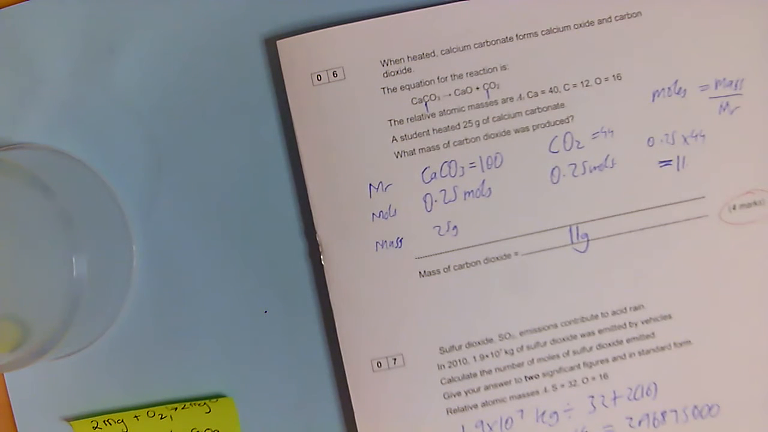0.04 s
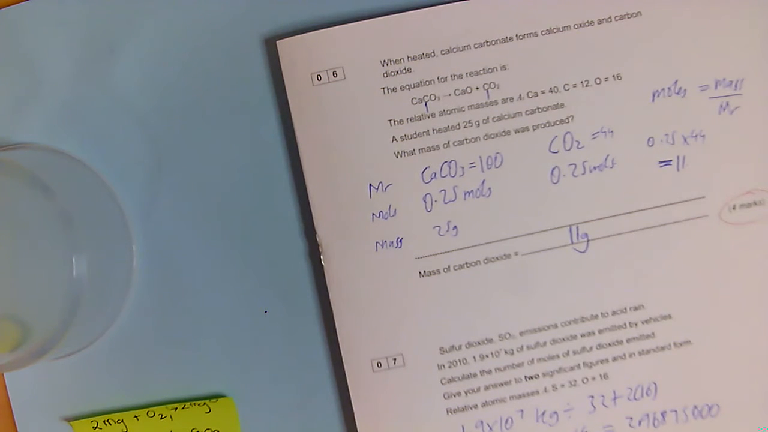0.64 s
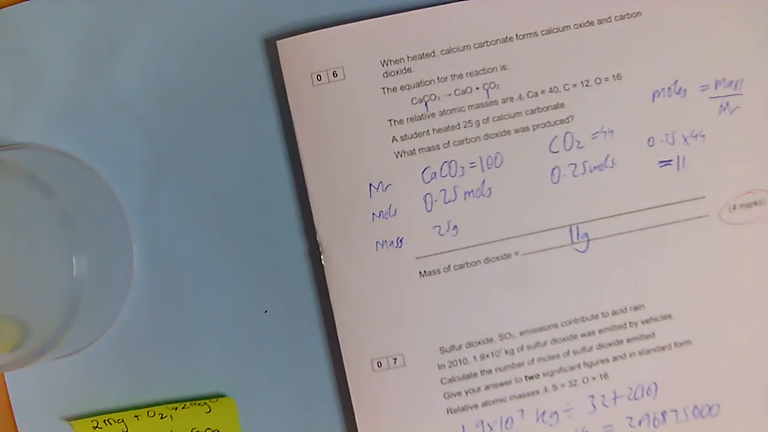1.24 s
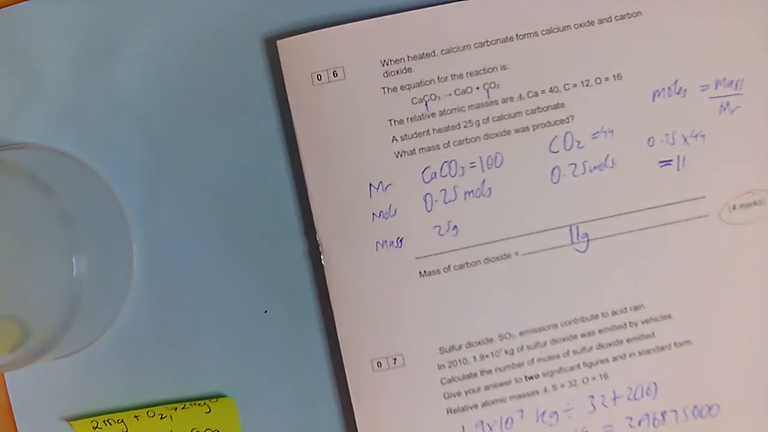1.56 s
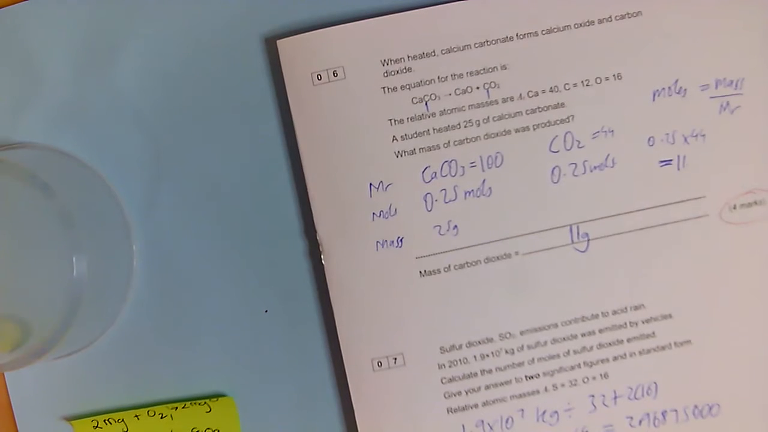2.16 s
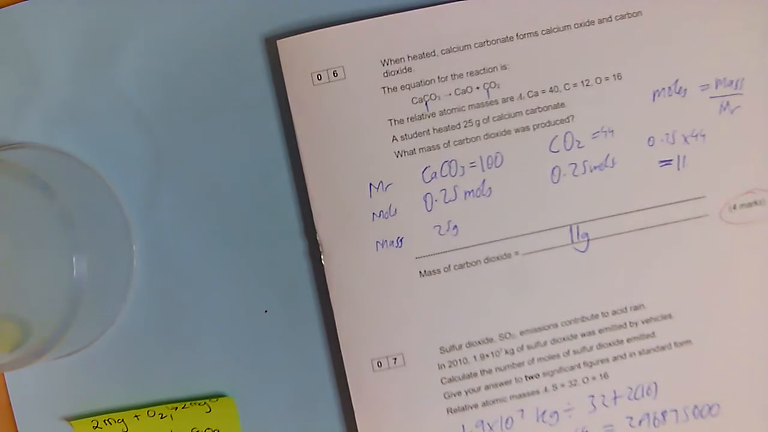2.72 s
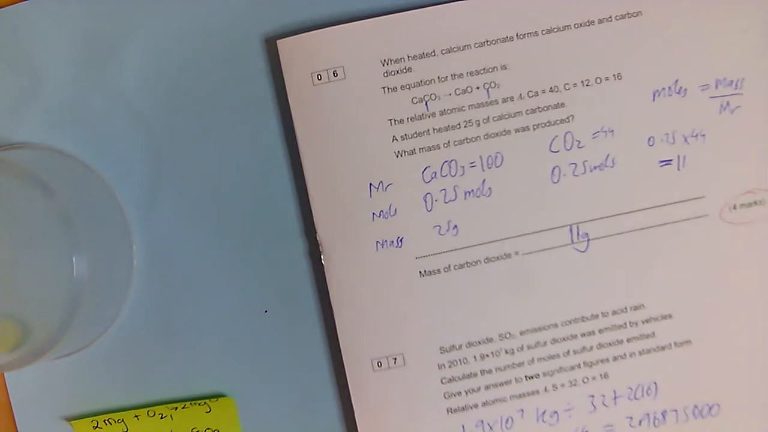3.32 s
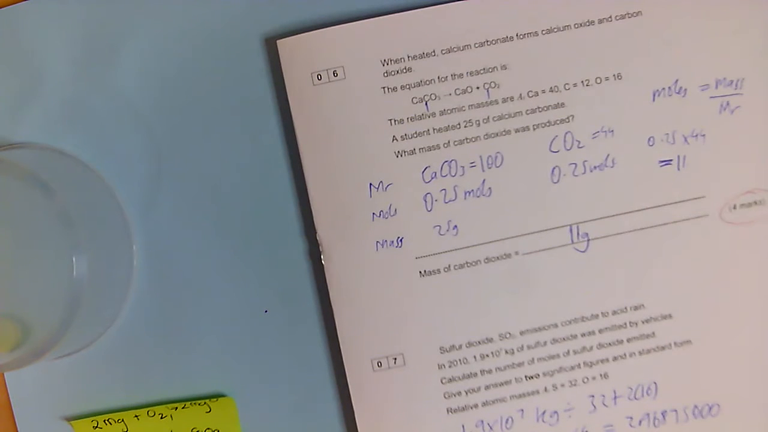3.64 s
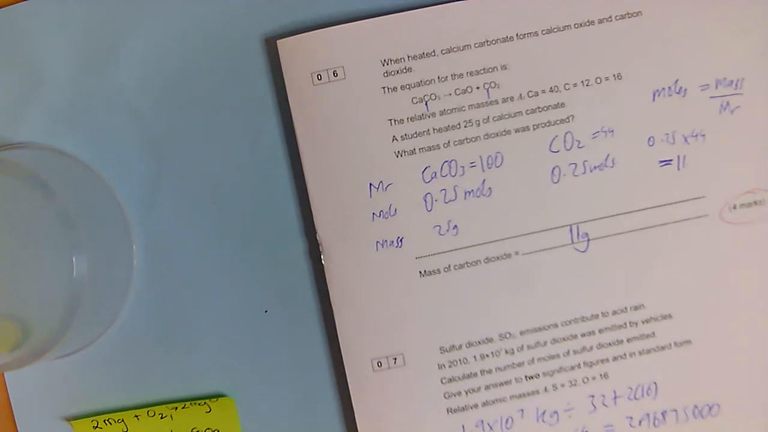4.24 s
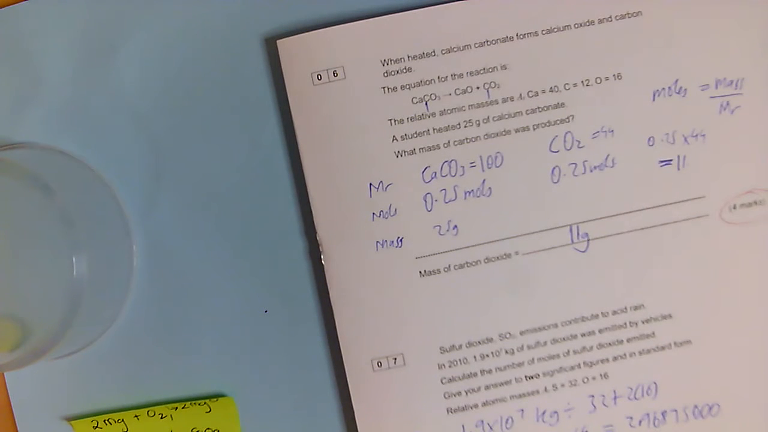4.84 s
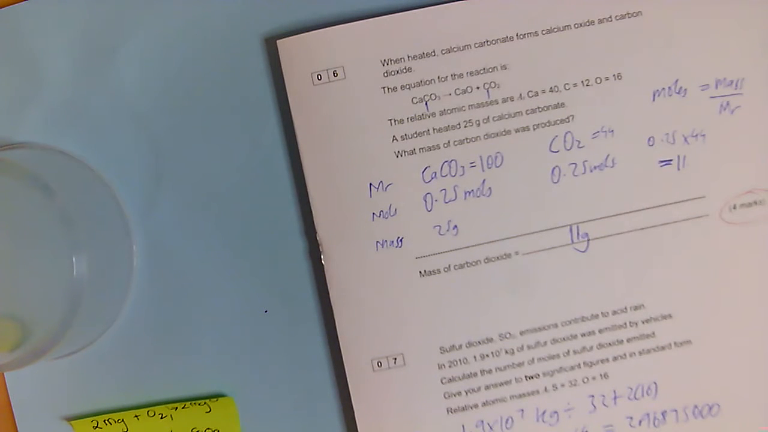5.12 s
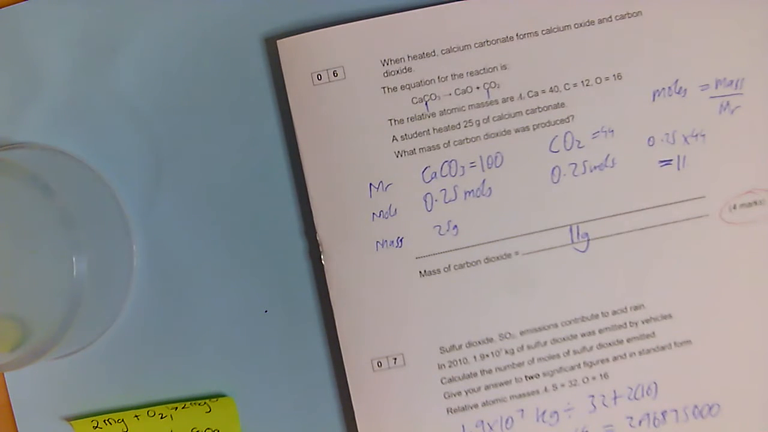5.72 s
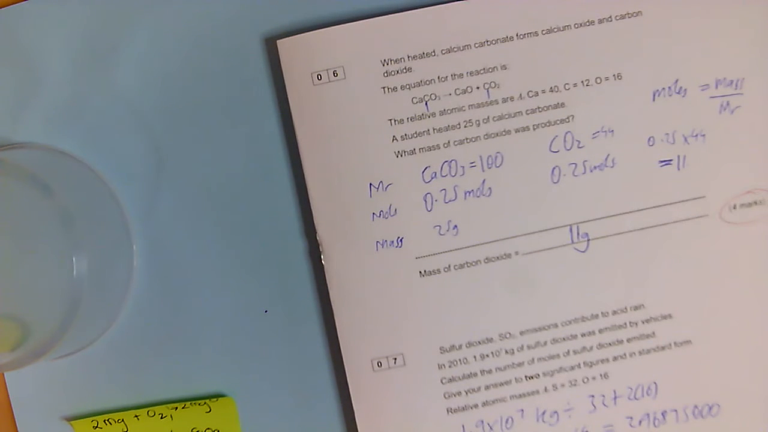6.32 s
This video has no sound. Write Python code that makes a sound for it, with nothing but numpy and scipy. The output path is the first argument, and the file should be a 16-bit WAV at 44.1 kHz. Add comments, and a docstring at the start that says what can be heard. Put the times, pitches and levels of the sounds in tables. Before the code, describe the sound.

A pen works on a paper booklet on a desk, heard close up in a quiet room. From the start, its tip makes light, dry taps and short, uneven scratches, some with a slightly hollow ring. The strokes grow stronger around 1.5 seconds and lead to the loudest sound at about 1.8 seconds, a sharp knock with a low thump through the desk. A lull follows, with only a few faint ticks and a weak, low drone that sinks in pitch between 2.2 and 2.9 seconds. The tapping and scratching then resume, getting busier from about 4 seconds, with soft, dull bumps of the hand. Crisp taps stand out near 4.7 and 5.4 seconds, and a second knock comes at 5.8. Lighter strokes continue until about 6.5 seconds. Soft room noise, a low hum and a very faint high whine run throughout.

```python
"""A pen taps and scratches on a paper booklet lying on a desk, close by in a quiet room.
The tip catches on paper fibres in uneven bursts; every catch and tap makes paper and desk ring.
A few harder blows ring the desk top, and the hardest thumps the whole desk.
Behind it lie soft room noise, a low hum, a brief drone and the thin whine of microphone electronics."""
import sys
import numpy as np
from scipy import signal
from scipy.fft import rfft, irfft
from scipy.io import wavfile
from scipy.ndimage import uniform_filter1d

SR = 44100
rng = np.random.default_rng(int(sys.argv[2]) if len(sys.argv) > 2 else 0)


def generate_wav(sig):
    """Save sig (samples, or channels by samples) to the path in sys.argv[1] as 16-bit PCM at SR."""
    pcm = np.round(np.clip(np.atleast_2d(sig).T, -1, 1) * 32767).astype(np.int16)
    wavfile.write(sys.argv[1], SR, pcm)


N = 285768


def gain_of(db):
    """Turns decibels into a number to multiply a sound by."""
    return 10 ** (np.asarray(db) / 20)


def evened(x):
    """Scales a sound to an average strength (rms) of one."""
    return x / np.sqrt(np.mean(x ** 2) + 1e-20)


def burst(sound, level_db):
    """Gives a short sound the energy of a fiftieth of a second at this level."""
    return gain_of(level_db) * np.sqrt(SR / 50) * sound / np.linalg.norm(sound)


def decay(t, t60):
    """A fade that falls by 60 dB every t60 seconds."""
    return np.exp(-np.log(1000) * t / t60)


def value_at(points, hz):
    """Reads between (Hz, value) points on a logarithmic pitch scale."""
    point_hz, value = np.transpose(points)
    return np.interp(np.log(hz + 1), np.log(point_hz + 1), value)


def octave_around(x, hz, order):
    """Keeps a band one octave wide; a higher order gives steeper edges."""
    edges = [hz / np.sqrt(2), hz * np.sqrt(2)]
    return signal.sosfilt(signal.butter(order, edges, "bandpass", fs=SR, output="sos"), x)


def add(mix, start, sound):
    """Mixes a sound in at a start time in seconds."""
    part = mix[max(round(start * SR), 0):][:len(sound)]
    part += sound[:len(part)]


def crossfades(count, seconds):
    """Fades that hand over to one another in turn, keeping the total power steady."""
    place = (np.arange(N) / SR / seconds - np.arange(count)[:, None]) % count
    distance = np.minimum(place, count - place)
    return np.cos(np.pi / 2 * np.minimum(distance, 1))


# The tone colour of the room noise. Each row: frequency in Hz, relative level in dB.
NOISE_COLOUR = [(15, -28), (28, -4), (90, -3.5), (140, -6.5), (300, -12.5), (520, -14.5), (800, -15),
                (1450, -15.5), (2000, -28), (2800, -31), (6500, -37.5), (8400, -36.5), (13000, -41.5),
                (15500, -53)]
def room_noise(level_db=-55):
    """A soft, even rush, strongest in the bass."""
    colour = gain_of(value_at(NOISE_COLOUR, np.fft.rfftfreq(N, 1 / SR)))
    noise = irfft(rfft(rng.standard_normal(N)) * colour, N)
    return gain_of(level_db) * evened(noise)


# Steady tones. Each row: pitch in Hz, average level in dB.
HUM_AND_WHINE = [(49, -65.5), (119, -62.5), (192, -70), (283, -68.5), (8000, -77), (8280, -76),
                 (10756, -87.5), (11041, -91)]
def hum_and_whine(waver_db=1):
    """A low hum and the thin whine of electronics; each tone wavers a little in level."""
    t, out = np.arange(N) / SR, np.zeros(N)
    for hz, level_db in HUM_AND_WHINE:
        waver = np.interp(t, np.linspace(0, t[-1], num=40), rng.standard_normal(size=40))
        tone = np.sqrt(2) * np.sin(2 * np.pi * (hz * t + rng.random()))
        out += gain_of(level_db + waver_db * waver) * tone
    return out


# The course of the drone. Each row: time in seconds, pitch in Hz, level in dB.
DRONE_PATH = [(2.2, 101.7, -75), (2.35, 92.3, -56.5), (2.65, 86.4, -59), (2.9, 77.7, -68)]
def drone():
    """A faint low note swells and fades while its pitch sinks."""
    t = np.arange(N) / SR
    times, hz, level_db = np.transpose(DRONE_PATH)
    tone = np.sqrt(2) * np.sin(2 * np.pi * np.cumsum(np.interp(t, times, hz)) / SR)
    sounding = (t > times[0]) & (t < times[-1])
    return sounding * gain_of(np.interp(t, times, level_db)) * tone


def room_echo(x, t60, treble_t60, delay_s, treble_db=0):
    """Many reflections blur into a tail whose treble has its own strength and fade."""
    reflections = rng.choice([-1., 1.], SR) * (rng.random(SR) < 4000 / SR)  # about 4000 a second
    hz, t, spectrum = signal.stft(reflections, SR, nperseg=256)
    fade = decay(t, value_at([(1500, t60), (9000, treble_t60)], hz)[:, None])
    colour = gain_of(value_at([(2000, 0), (9000, treble_db)], hz))[:, None]
    tail = signal.istft(spectrum * fade * colour, SR, nperseg=256)[1]
    out = np.zeros(N)
    add(out, delay_s, signal.fftconvolve(x, tail / np.linalg.norm(tail)))
    return out * np.sqrt(np.mean(colour ** 2))


# The hand bumping the desk. Each row: start in seconds, level in dB, pitch in Hz.
HAND_PATS = [(0.965, -49.5, 122), (1.685, -35, 344), (1.775, -55, 70), (1.85, -41.5, 45), (3.676, -38, 293),
             (4.259, -39, 191), (4.267, -40.5, 101), (4.523, -49, 259), (4.882, -53, 310), (5.21, -48, 100),
             (5.245, -49, 94), (5.285, -50, 100), (5.807, -43.5, 480)]
def hand_pats(t60=0.09, rise_s=0.0095):
    """The soft hand gives a short, dull puff around one pitch."""
    t, out = np.arange(SR // 4) / SR, np.zeros(N)
    for start, level_db, hz in HAND_PATS:
        push = rng.standard_normal(len(t)) * (1 - np.exp(-t / rise_s)) * decay(t, t60)
        add(out, start, burst(octave_around(push, hz, order=2), level_db))
    return out


# The whole desk's low notes. Each row: pitch in Hz, relative level in dB, seconds to fade by 60 dB.
DESK_NOTES = [(34.3, -10.5, 0.49), (78.5, -14, 0.19), (131.7, 6, 0.15), (143.4, -5.5, 0.21),
              (293, -2, 0.052), (436, -2, 0.095), (698, 6, 0.049)]
# Blows that move the whole desk. Each row: start in seconds, level in dB.
DESK_THUMPS = [(1.753, -43), (1.768, -23)]
def desk_thumps(rise_s=0.0073):
    """A heavy blow sets the whole desk swinging at its low notes."""
    t, out = np.arange(SR // 2) / SR, np.zeros(N)
    thump = sum(gain_of(db) * decay(t, t60) * np.sin(2 * np.pi * hz * t) for hz, db, t60 in DESK_NOTES)
    for start, level_db in DESK_THUMPS:
        add(out, start, gain_of(level_db) * thump * (1 - np.exp(-t / rise_s)))
    return out


# Notes of desk top and booklet. Each row: pitch in Hz, relative level in dB, seconds to fade by 60 dB.
TOP_NOTES = [(474, -10.5, 0.085), (520, -21.5, 0.18), (940, -23, 0.049), (1105, 0, 0.067), (1297, 1, 0.07),
             (1471, 3, 0.036), (1499, -15, 0.18), (1570, -16, 0.22), (1690, -15.5, 0.16), (2090, -15, 0.11),
             (2340, -16, 0.11), (2600, -12, .09), (3800, -35, 0.1), (6460, -29, 0.13)]
# Hard blows through the booklet. Each row: start in seconds, level in dB, favoured pitch in Hz.
DESK_KNOCKS = [(1.6827, -32, 910), (1.7535, -18.5, 1375), (5.8062, -21, 1090)]
def desk_knocks(rise_s=0.00011, favour_db=7, favour_octaves=0.14):
    """A hard blow rings the desk top; the place it lands on favours the notes near one pitch."""
    t, out = np.arange(SR // 3) / SR, np.zeros(N)
    for start, level_db, favoured_hz in DESK_KNOCKS:
        for hz, note_db, t60 in TOP_NOTES:
            boost_db = favour_db * np.exp(-(np.log2(hz / favoured_hz) / favour_octaves) ** 2)
            note = decay(t, t60) * np.sin(2 * np.pi * (hz * t + rng.random()))
            add(out, start, gain_of(level_db + note_db + boost_db) * note * (1 - np.exp(-t / rise_s)))
    return out


def fibre_catches(samples, per_s, spread_db):
    """Fibres snap free under the tip: random clicks, most small, a few large."""
    size = gain_of(spread_db * np.minimum(rng.exponential(1, samples), 4))
    return size * rng.choice([-1, 1], samples) * (rng.random(samples) < per_s / SR)


def ring(colour, size=2048):
    """The short ring that follows one click, in the given tone colour."""
    log_gain = np.log(gain_of(value_at(colour, abs(np.fft.fftfreq(size, 1 / SR)))))
    spectrum = np.exp(np.conj(signal.hilbert(log_gain)))  # nothing sounds before the click
    ringing = np.fft.ifft(spectrum).real[:size // 2]
    return ringing / np.linalg.norm(ringing)


# The four voices of paper on a desk. Each row: frequency in Hz, relative level in dB.
DULL_BODY = [(60, 0.5), (170, -32.5), (300, 7.5), (450, 1), (620, 3.5), (800, -5.5), (1100, 1),
             (2500, -88.5)]
PAPERY_MIDDLE = [(300, -65), (650, -18.5), (800, -11), (950, -3), (1080, -1), (1220, -0.5), (1380, 3.5),
                 (1550, -0.5), (1720, -4), (2050, -9.5), (2600, -26.5), (3300, -40.5), (6000, -89)]
CRISP_EDGE = [(1200, -32.5), (2250, 2.5), (3100, -1), (3900, 3), (4450, 5.5), (5700, -7.5), (6700, -5),
              (7600, -22), (10000, -19), (15500, -54)]
FINE_SHEEN = [(4000, -45), (7000, -4), (8700, 4), (9900, 15.5), (10900, 2), (12500, 5), (14500, -16),
              (15700, -33)]
# Echoes off nearby things. Each row: typical delay in seconds, relative strength (minus flips the wave).
NEARBY_ECHOES = [(.00335, -0.46), (0.0097, 0.52), (0.018, 0.014)]
def paper_voices(focus=1):
    """Each spot on the page rings and echoes in its own way; a focus under 1 weakens both quirks."""
    hz = np.geomspace(60, 16000, num=130)
    resonances_db = focus * np.interp(hz, [1500, 4000], [1.8, 1]) * rng.standard_normal(len(hz))
    paths = np.zeros(SR // 40)
    paths[0] = 1  # the direct sound
    for delay, strength in NEARBY_ECHOES:
        add(paths, delay * rng.uniform(.8, 1.2), np.array([focus * strength]))
    voices = []
    for colour in (DULL_BODY, PAPERY_MIDDLE, CRISP_EDGE, FINE_SHEEN):
        spot_colour = np.c_[hz, value_at(colour, hz) + resonances_db]
        voice = signal.fftconvolve(ring(spot_colour), paths)
        voices.append(voice / np.linalg.norm(voice))
    return voices


# Papery rasps. Each row: start in seconds, level in dB, sheen in dB relative to the crisp edge.
PAPER_RASPS = [(0.789, -52.5, -28), (1.757, -51, -9), (2.895, -57.5, -25), (3.646, -58, -11),
               (3.757, -55, -22), (4.24, -51, -17), (4.728, -44, -14), (5.388, -48, -10),
               (5.808, -41.5, -11.5)]
def paper_rasps(t60=0.12, rise_s=0.00156):
    """After a hard strike the sheet crackles as it settles."""
    t, out = np.arange(SR // 6) / SR, np.zeros(N)
    settle = (1 - np.exp(-t / rise_s)) * decay(t, t60)
    for start, level_db, sheen_db in PAPER_RASPS:
        crackle = fibre_catches(len(t), per_s=3000, spread_db=2.5) * settle
        _, _, crisp, sheen = paper_voices(focus=0.26)
        rasp = signal.fftconvolve(crackle, crisp + gain_of(sheen_db) * sheen)
        add(out, start, burst(rasp, level_db))
    return out


# Hollow scuffs. Each row: start in seconds, length in seconds, level in dB, pitch in Hz.
TIP_DRAGS = [(0.246, 0.005, -43.5, 1070), (0.691, 0.014, -37, 1130), (0.846, 0.014, -34.5, 1310),
             (1.124, 0.0088, -36.5, 1080), (1.478, 0.035, -35, 1300), (3.131, 0.0028, -42.5, 900),
             (3.264, 0.018, -37, 1435), (4.615, 0.017, -34, 1040), (4.872, 0.012, -34, 970),
             (5.387, 0.021, -30.5, 1006), (5.388, 0.014, -32.5, 1960), (5.59, 0.0027, -37, 1330)]
def tip_drags(width_hz=90, rise_s=0.0021, release_s=0.0044):
    """The dragging tip makes the sheet ring at one pitch, which gives a hollow note."""
    t, out = np.arange(SR // 6) / SR, np.zeros(N)
    for start, length, level_db, hz in TIP_DRAGS:
        drag = np.minimum(t / rise_s, 1) * np.exp(-np.maximum(t - length, 0) / release_s)
        push = fibre_catches(len(t), per_s=3000, spread_db=2.0) * drag
        ringing = np.exp(-np.pi * width_hz * t) * np.sin(2 * np.pi * hz * t)
        add(out, start, burst(signal.fftconvolve(push, ringing), level_db))
    return out


# Dry snaps as the pen lands. Each row: start in seconds, level in dB, pitch in Hz.
TIP_SNAPS = [(.79, -58.5, 5140), (1.686, -49, 2680), (1.7543, -39.5, 2750), (2.894, -50, 2680),
             (3.01, -51.5, 3400), (3.07, -54.5, 3250), (3.194, -55.5, 2940), (3.266, -47, 2280),
             (3.645, -59, 2470), (3.757, -48, 3400), (4.237, -53, 5330), (4.725, -42, 4180),
             (5.188, -52.5, 5450), (5.3855, -43, 5340), (5.48, -53.5, 6000), (5.687, -70, 4100)]
def tip_snaps(t60=0.0018, shudder=0.11, shudder_t60=0.18):
    """The hard point gives a sharp click around one pitch, and the sheet shudders after it."""
    t, out = np.arange(SR // 12) / SR, np.zeros(N)
    fade = decay(t, t60) + shudder * decay(t, shudder_t60)
    for start, level_db, hz in TIP_SNAPS:
        click = octave_around(rng.standard_normal(len(t)) * fade, hz, order=3)
        add(out, start, burst(click, level_db))
    return out


def stroke_pressure(start, length, lift_s, press_s=0.01, ease_db=-1.5):
    """In one stroke the pen presses in, eases off and lifts."""
    t, pressure = np.arange(round((length + 6 * lift_s) * SR)) / SR, np.zeros(N)
    press = np.minimum(t / press_s, 1)
    lift = np.exp(-np.maximum(t - length, 0) / lift_s)
    add(pressure, start, press * gain_of(ease_db * t / length) * lift)
    return pressure


# Pen strokes. Each row: start in seconds, length in seconds, level in dB, relative crispness in dB.
PEN_STROKES = [(0.0, 0.073, -55.5, -16), (0.384, 0.17, -55, -20), (0.614, 0.17, -52, -25),
               (0.812, 0.12, -51, -20), (1.14, 0.024, -40, -18), (1.449, 0.064, -35.5, -19.5),
               (1.527, 0.02, -43.5, -19), (1.553, 0.038, -42.5, -15.5), (1.595, 0.042, -43, -15),
               (1.654, 0.028, -39.5, -15.5), (1.67, 0.077, -39, -18), (1.992, 0.08, -57, -12),
               (2.307, 0.027, -59.5, -12), (2.811, 0.074, -56.5, -17), (2.932, 0.041, -43, -19),
               (3.17, 0.25, -54, -20), (3.343, 0.058, -46.5, -14.5), (3.41, 0.074, -60, -8),
               (3.496, 0.031, -49, -14), (3.695, 0.12, -50, -18), (3.818, 0.091, -49, -12.5),
               (4.048, 0.059, -47, -14), (4.117, 0.084, -43, -13.5), (4.275, 0.073, -49, -18),
               (4.457, 0.15, -44.5, -11.5), (4.624, 0.314, -41, -19.5), (4.815, 0.094, -38, -14.5),
               (5.058, 0.18, -52.5, -14.5), (5.162, 0.041, -40, -18), (5.233, 0.18, -47, -16),
               (5.359, 0.11, -43.5, -12.5), (5.536, 0.094, -57, -21), (5.651, 0.1, -51, -8),
               (5.766, 0.076, -44.5, -13), (5.94, 0.19, -53, -13.5), (6.105, 0.066, -49.5, -18),
               (6.271, 0.11, -47, -11), (6.346, 0.2, -46.5, -12)]
# Long spells when the hand brushes the page between strokes. Each row reads like a pen stroke.
WRITING_SPELLS = [(0, 1.303, -61, -19), (2.887, 3.6, -61, -11)]
# Fine, high hisses of the paper. Each row: start in seconds, length in seconds, level in dB.
PAPER_HISSES = [(1.155, 0.033, -67), (1.62, 0.17, -66), (3.643, .012, -68), (4.14, .05, -71),
                (4.421, 0.28, -74), (4.828, 0.073, -74), (5.182, 0.0046, -49.5), (5.374, 0.011, -49),
                (5.801, 0.0091, -47)]
def pen_scratching(body_db=-11, sheen_db=-17):
    """The tip plucks fine fibres and coarser grit as it slides; the hand's pressure trembles."""
    level, crisp, hiss = np.zeros((3, N))
    for start, length, level_db, crisp_db in PEN_STROKES + WRITING_SPELLS:
        stroke = gain_of(level_db) * stroke_pressure(start, length, lift_s=0.021)
        level = np.hypot(level, stroke)  # overlapping strokes add their power
        crisp = np.hypot(crisp, stroke * gain_of(crisp_db))
    for start, length, level_db in PAPER_HISSES:
        hiss += gain_of(level_db) * stroke_pressure(start, length, lift_s=0.0058)
    sheen = np.hypot(crisp * gain_of(sheen_db), hiss)
    tremble = evened(uniform_filter1d(rng.standard_normal(N), size=400))
    fine = evened(fibre_catches(N, per_s=3500, spread_db=1.5))
    grit = evened(fibre_catches(N, per_s=400, spread_db=1.6))
    gritty = evened((fine + grit) * gain_of(1.9 * tremble))
    smooth = evened(fine * gain_of(1.1 * tremble))
    pushes = [smooth * level * gain_of(body_db), gritty * level, smooth * crisp, smooth * sheen]
    out = np.zeros(N)
    for share in crossfades(count=5, seconds=.07):  # the tip moves from spot to spot
        for push, voice in zip(pushes, paper_voices(focus=0.56)):
            out += signal.oaconvolve(push * share, voice)[:N]
    return out


def faint_ticks(per_s=2.1, length_s=.005, level_db=-53, body_db=-7, crisp_db=-16):
    """The tip touches the page lightly at random moments during the writing spells."""
    count = round(per_s * N / SR)
    times = (np.arange(count) + rng.random(count)) * N / SR / count
    return pen_taps([(time, length_s, level_db, body_db, crisp_db) for time in times
                     if any(0 < time - start < length for start, length, *_ in WRITING_SPELLS)])


# Clear strikes and scuffs of the tip. Each row: start in seconds, contact time in seconds,
# level of the papery middle in dB, then body and crispness in dB relative to that level.
PEN_TAPS = [(0.002, 0.0072, -44.5, -1.5, -17), (0.071, 0.0055, -56.5, 3, -31),
            (0.245, 0.0036, -39.5, -12, -40), (0.292, 0.012, -42.5, -37, -19.5),
            (0.452, 0.00099, -38.5, -3.5, -26), (0.606, .003, -54.5, 7, -32), (0.63, 0.0068, -52.5, 5, -32),
            (0.654, 0.0079, -46, -16, -23), (0.671, 0.012, -42, -7.5, -29), (0.692, 0.013, -40.5, 1, -23),
            (0.789, 0.0068, -40, -5, -22), (0.847, 0.021, -45.5, -1, -29), (0.887, 0.023, -42.5, -0.5, -19),
            (0.959, 0.016, -49.5, 0, -16), (1.124, 0.009, -39, 4.5, -25), (1.17, 0.033, -49.5, -13, -1),
            (1.27, 0.02, -47.5, -8, -22), (1.431, 0.013, -48, 3, -21), (1.4905, 0.0034, -34, -26, -28),
            (1.556, .006, -53, -12, -2), (1.618, 0.028, -50, 9, -1), (1.6828, 0.002, -28, -2, -24),
            (1.725, 0.00356, -42, 9.5, -32), (1.739, 0.023, -31, -0.5, -8),
            (1.7525, 0.0029, -21.5, -3, -21), (1.7566, 0.0019, -24, -4, -15.5),
            (1.765, 0.002, -37.5, 3.5, -4), (1.774, 0.0033, -43, -14, -1), (2.045, 0.014, -46, -21, -32),
            (2.666, 0.022, -49.5, -8, -12), (2.8935, 0.0047, -39.5, -21, -25),
            (2.969, 0.0035, -40, -7, -34), (3.0075, 0.0014, -29.5, -22, -25.5),
            (3.07, 0.0091, -49.5, -15, -15), (3.132, 0.0018, -46, 6, -38), (3.194, 0.0048, -45, -12, -25),
            (3.26, 0.027, -32.5, -13, -22.5), (3.55, 0.02, -45.5, -3, -18),
            (3.6425, 0.0016, -41, -12, -8.5), (3.677, 0.026, -37.5, 1.5, -28),
            (3.754, 0.0046, -39, -28, -8.5), (3.919, 0.0023, -46, -8.5, -24),
            (4.005, 0.0064, -55, -13, -9.5), (4.062, 0.0033, -46, -6, -16), (4.133, 0.0066, -41.5, -8, -30),
            (4.15, 0.014, -40, -5, -17), (4.1685, 0.0034, -32.5, -19, -18), (4.239, 0.0032, -33, -38, -12),
            (4.258, 0.027, -35.5, -0.5, -19), (4.341, 0.014, -44, -23, -32), (4.383, 0.0046, -49, -19, -16),
            (4.421, 0.0079, -47.5, -4, -16), (4.501, 0.0043, -53, -21, -6), (4.522, 0.0044, -35, -9, -21),
            (4.615, 0.009, -36.5, -12, -29), (4.6229, 0.0018, -38, -11, -7),
            (4.681, 0.0032, -37, -27, -16.5), (4.7225, 0.0081, -28.5, -20, -6),
            (4.763, 0.008, -32.5, -13, -30), (4.803, 0.006, -41.5, -5.5, -29), (4.835, 0.0053, -38, -5, -8),
            (4.874, 0.01, -35, -21, -18), (4.906, 0.0033, -35, -22, -29), (5.047, 0.0035, -45.5, -6, -29),
            (5.187, 0.002, -38.5, -27, -10.5), (5.251, 0.013, -39.5, -10, -28),
            (5.2935, 0.0019, -36.5, -10.5, -26), (5.327, 0.029, -36, -14, -21),
            (5.384, 0.0034, -26.5, -24, -10.5), (5.392, 0.019, -25.5, -42, -34),
            (5.45, 0.014, -38.5, -33, -25), (5.4798, 0.002, -37, -32, -12),
            (5.591, 0.0026, -37.5, -13.5, -34), (5.6863, 0.0053, -41, -30, -5.5),
            (5.779, 0.0029, -57, -16, -12), (5.8055, 0.0029, -23.5, -12.5, -11),
            (5.8695, 0.0099, -35.5, -17, -22), (5.947, .003, -49, -12, -17), (6.021, 0.0021, -49, -19, -18),
            (6.103, 0.0017, -40, -24, -18.5), (6.226, 0.013, -44, -23, -17), (6.291, 0.004, -40.5, -9, -24),
            (6.318, 0.004, -33.5, -11, -18), (6.413, 0.022, -38.5, -11, -10)]
def pen_taps(rows, sheen_db=-20, shortest_s=.002):
    """The tip lands with a tiny crunch and skids over the fibres; the sheet shudders a little longer."""
    t, out = np.arange(SR // 12) / SR, np.zeros(N)
    shudder = .34 * np.exp(-t / .012)
    for start, length, level_db, body_db, crisp_db in rows:
        length = max(length, shortest_s)
        contact = (t < length) * (1 - .5 * t / length)
        push = fibre_catches(len(t), per_s=12000, spread_db=2.5) * np.maximum(contact, shudder)
        push[0] = .15 * np.linalg.norm(push)  # the click of first touch
        for voice, voice_db in zip(paper_voices(), [body_db, 0, crisp_db, crisp_db + sheen_db]):
            add(out, start, burst(signal.fftconvolve(push, voice), level_db + voice_db))
    return out


def scene(direct_db=-2.5, near_db=-8.5, far_db=-21):
    """Mixes the pen and its short and long room echoes with the low bumps and the background."""
    pen = pen_taps(PEN_TAPS) + tip_snaps() + tip_drags() + paper_rasps() + desk_knocks()
    pen += pen_scratching() + faint_ticks()
    # the near reflections change as the hand moves
    near = sum(room_echo(pen * share, t60=0.15, treble_t60=0.22, delay_s=0.001983, treble_db=-11)
               for share in crossfades(count=5, seconds=.11))
    far = room_echo(pen, t60=0.34, treble_t60=0.32, delay_s=0.014)
    pen_in_room = gain_of(direct_db) * pen + gain_of(near_db) * near + gain_of(far_db) * far
    return (pen_in_room + desk_thumps() + hand_pats() + room_noise() + hum_and_whine() + drone())[None]


def record(dry, cutoff_hz=15700):
    """Cuts away the very highest treble."""
    lowpass = signal.firwin(511, cutoff_hz, window=("kaiser", 9), fs=SR)
    return signal.oaconvolve(dry, lowpass[None], "same")


dry = scene()
out = record(dry)
generate_wav(out)
```